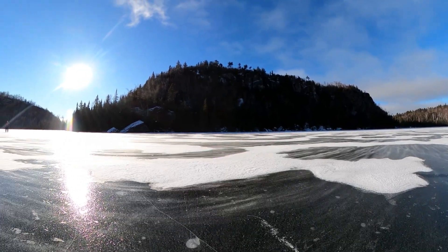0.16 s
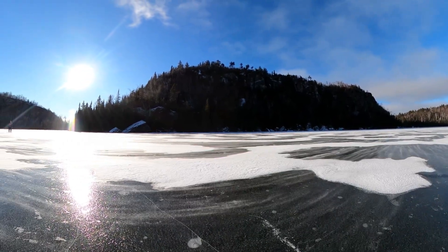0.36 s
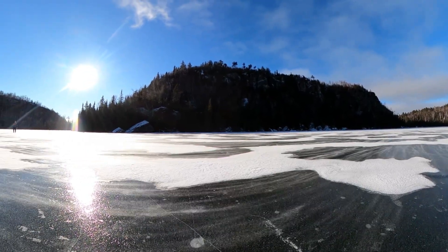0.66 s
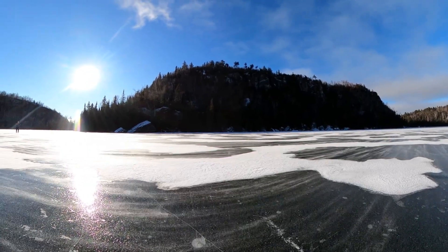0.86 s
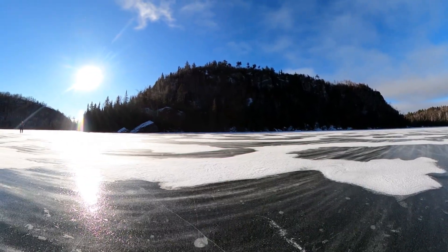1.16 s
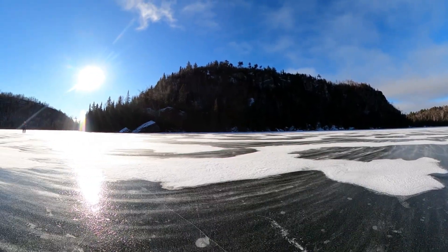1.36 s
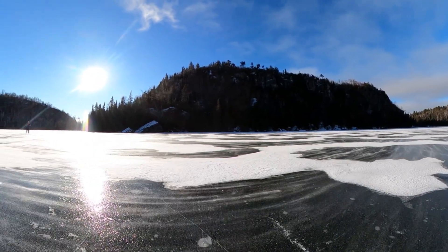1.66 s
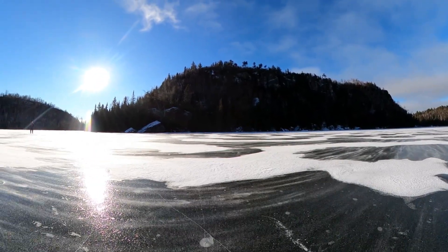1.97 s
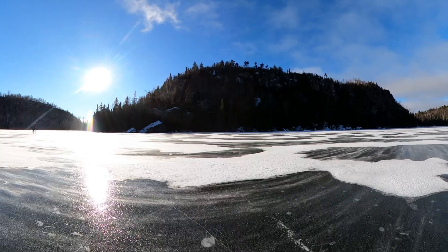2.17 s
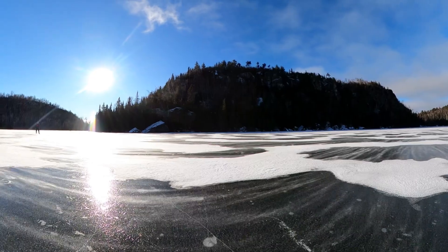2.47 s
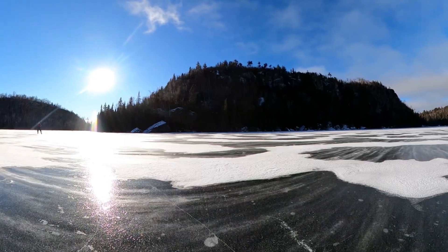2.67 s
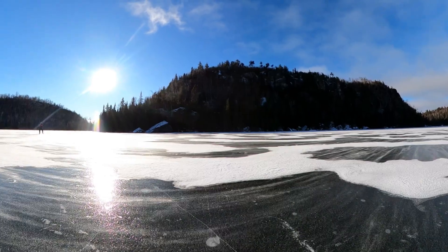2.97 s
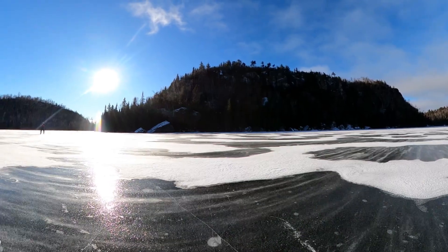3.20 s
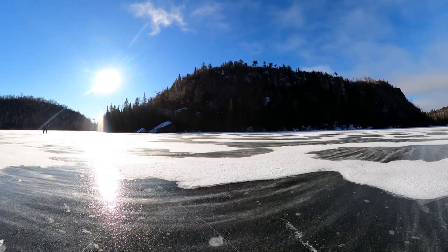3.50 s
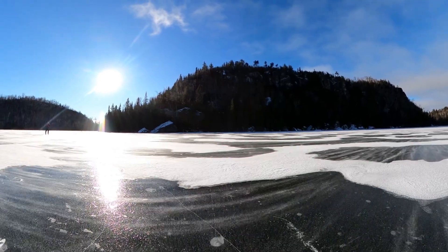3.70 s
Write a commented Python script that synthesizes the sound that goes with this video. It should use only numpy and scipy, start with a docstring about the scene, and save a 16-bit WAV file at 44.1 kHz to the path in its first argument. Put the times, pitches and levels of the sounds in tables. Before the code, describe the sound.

Strong gusty wind buffets a microphone with deep heavy rumble, sputtering crackle and sharp pops

```python
"""Wind on microphones by a frozen lake

Gusts sweep over the ice and buffet a camera's microphones. Eddies push on the port as a heavy rumble:
coloured noises under level curves, with cosines that swell and fade for single thumps, deep or higher.
Tearing air sputters and pops: noise in uneven spurts, kept above a steep crossover to a second microphone.
Two brief hoarse whistles are wavering sines. A soft knock and a few ticks of blown ice grains
are noise under short envelopes, over a faint steady hiss of noise."""
import sys
import numpy as np
from scipy import signal
from scipy.fft import rfft, irfft
from scipy.io import wavfile
from scipy.ndimage import uniform_filter1d

SR = 44100
rng = np.random.default_rng(int(sys.argv[2]) if len(sys.argv) > 2 else 0)


def pcm_store(signal):
    """Save signal as 16-bit PCM."""
    levels = np.round(np.clip(np.atleast_2d(signal), -1, 1) * 32767)
    wavfile.write(sys.argv[1], SR, levels.astype(np.int16).T)


N = 169344
TIME = np.arange(N) / SR  # seconds

# Gust levels before the trims below, from the deepest layer to the highest: time_s, level_db
# deepest rumble, the push of the large eddies
PUSH_LEVEL = [(0.0, -25.5), (0.2, -35.0), (0.37, -26.0), (0.43, -33.0), (0.5, -22.0), (0.59, -26.0),
              (0.65, -33.0), (0.86, -34.5), (0.89, -38.0), (0.95, -31.5), (1.34, -29.5), (1.38, -25.5),
              (1.65, -27.0), (1.68, -33.0), (1.78, -25.0), (2.04, -33.0), (2.12, -30.5), (2.32, -44.5),
              (2.43, -30.5), (2.57, -40.5), (2.6, -30.5), (2.76, -37.5), (2.81, -26.5), (2.92, -35.0),
              (3.05, -34.5), (3.08, -39.0), (3.22, -28.5), (3.35, -33.0), (3.43, -27.0), (3.46, -33.5),
              (3.69, -28.5), (3.83, -38.0)]
# buffeting around 100 Hz
BUFFET_LEVEL = [(0.0, -35.0), (0.06, -40.0), (0.62, -29.5), (0.66, -37.5), (0.75, -32.0), (0.89, -45.5),
                (0.93, -30.5), (1.03, -42.5), (1.19, -29.5), (1.27, -35.0), (1.35, -25.0), (1.46, -38.5),
                (1.6, -29.0), (1.75, -37.0), (1.88, -31.0), (1.92, -36.5), (2.06, -31.5), (2.21, -41.0),
                (2.27, -38.0), (2.39, -41.5), (2.55, -38.5), (2.59, -26.0), (2.73, -44.0), (2.76, -29.5),
                (2.83, -38.0), (2.9, -33.0), (3.06, -41.0), (3.18, -38.0), (3.23, -30.0), (3.29, -35.5),
                (3.37, -29.0), (3.51, -38.0), (3.54, -30.5), (3.83, -35.0)]
# flapping around 200 Hz
FLAP_LEVEL = [(0.0, -48.0), (0.15, -54.5), (0.22, -45.5), (0.38, -56.5), (0.58, -43.0), (0.68, -51.0),
              (0.74, -46.0), (0.85, -57.5), (1.03, -60.5), (1.07, -46.5), (1.23, -58.0), (1.39, -43.5),
              (1.48, -51.5), (1.67, -44.5), (1.72, -49.5), (1.8, -40.0), (1.92, -45.5), (2.12, -43.5),
              (2.32, -57.0), (2.44, -51.5), (2.51, -55.0), (2.6, -40.0), (2.72, -56.5), (2.78, -45.0),
              (3.16, -47.0), (3.22, -44.0), (3.49, -44.0), (3.55, -37.5), (3.64, -44.0), (3.83, -42.0)]
# roar of the small eddies
ROAR_LEVEL = [(0.0, -67.0), (0.23, -64.0), (0.41, -66.5), (0.49, -56.5), (0.68, -65.5), (0.77, -58.0),
              (0.81, -68.5), (1.02, -69.5), (1.13, -64.5), (1.25, -69.5), (1.41, -58.5), (1.46, -67.0),
              (1.55, -63.0), (1.68, -64.5), (1.75, -56.5), (1.96, -63.5), (2.09, -62.0), (2.4, -69.0),
              (2.59, -59.0), (2.74, -70.0), (2.83, -61.5), (3.08, -65.5), (3.16, -62.5), (3.22, -49.0),
              (3.29, -61.0), (3.34, -51.0), (3.43, -59.0), (3.5, -54.0), (3.58, -48.0), (3.63, -55.0),
              (3.76, -48.5), (3.83, -62.5)]
# sputter of the tearing air
SPUTTER_LEVEL = [(0.0, -57), (0.018, -53), (0.084, -64), (0.103, -50), (0.15, -54), (0.18, -78),
                 (0.208, -50), (0.228, -51), (0.258, -71), (0.288, -48), (0.325, -57), (0.355, -48),
                 (0.377, -73), (0.449, -45), (0.503, -39), (0.539, -55), (0.563, -41), (0.6, -53),
                 (0.682, -43), (0.79, -42), (0.85, -49), (0.94, -54), (0.952, -42), (1.137, -51),
                 (1.161, -44), (1.179, -67), (1.209, -41), (1.227, -54), (1.251, -42), (1.275, -52),
                 (1.38, -53), (1.41, -41), (1.449, -66), (1.485, -49), (1.533, -63), (1.556, -50),
                 (1.622, -47), (1.658, -59), (1.682, -53), (1.712, -66), (1.73, -49), (1.784, -54),
                 (1.874, -45), (1.993, -50), (2.077, -47), (2.095, -60), (2.197, -55), (2.239, -61),
                 (2.353, -51), (2.395, -84), (2.545, -82), (2.57, -60), (2.598, -53), (2.628, -63),
                 (2.676, -50), (2.698, -54), (2.708, -68), (2.73, -74), (2.82, -54), (2.939, -65),
                 (2.987, -56), (3.01, -62), (3.05, -51), (3.131, -54), (3.145, -66), (3.175, -70),
                 (3.191, -56), (3.31, -50), (3.325, -62), (3.36, -63), (3.406, -47), (3.55, -43),
                 (3.598, -55), (3.658, -40), (3.712, -49), (3.741, -40), (3.765, -54), (3.795, -40),
                 (3.837, -53)]
# Trims added to the tabulated levels, dB
PUSH_TRIM_DB, BUFFET_TRIM_DB, FLAP_TRIM_DB, ROAR_TRIM_DB = 0.5, 0.52, 0.9, 0.55
SPUTTER_TRIM_DB, POP_TRIM_DB = 0.45, -2

# Relative spectra of the noises, each scaled to rms 1 after filtering: frequency_hz, relative_db
PUSH_SPECTRUM = [(5, -19.5), (15, 0.5), (28, 3.5), (40, -5.5), (55, 4), (72, -2), (95, -15), (150, -36),
                 (300, -99.5)]
BUFFET_SPECTRUM = [(50, -21.5), (80, 1.5), (100, 3.5), (120, 1.5), (145, -5), (170, -14), (220, -44.5),
                   (400, -87.5)]
FLAP_SPECTRUM = [(120, -21), (170, 3), (205, 1), (240, -8.5), (280, -17.5), (360, -29), (700, -82)]
ROAR_SPECTRUM = [(180, -13.5), (280, 0.5), (340, -4), (420, -9.5), (520, -14), (700, -23), (1000, -31),
                 (1400, -33.5), (2500, -74)]
SPUTTER_SPECTRUM = [(1500, 5.5), (1900, -1), (2400, -9.5), (3000, -16.5), (4000, -29), (5000, -43),
                    (7000, -62.5), (10000, -91.5)]
HISS_SPECTRUM = [(100, 5), (700, 10), (1300, 3), (2500, -2.5), (4000, 4), (6000, 3.5), (7300, 5.5),
                 (7800, -0.5), (8500, -13.5), (9200, -18), (10500, -19.5), (13000, -32.5)]
KNOCK_SPECTRUM = [(500, -27), (880, 9), (1150, 0), (1500, -33)]
TICK_SPECTRUM = [(1500, 6), (3500, 3), (4500, 14.5), (5500, 1), (7500, 3.5), (9000, -27), (13000, -40.5)]

# Brief dropouts of the rumble: centre_s, depth_db, half_length_s
RUMBLE_LULLS = [(.893, 15, .02), (1.03, 13, .008), (1.275, 9, .01), (2.395, 7, .012)]
# Depth of the sputter's spurts, as the flow grows smoother halfway: time_s, depth_db
SPURT_DEPTH = [(1.7, 5), (2.2, 3.5)]
# Single eddies bursting on the port: centre_s, level_db (before trim), width_s, tilt_db_per_octave
POP_EVENTS = [(0.0103, -46, 0.015, 3), (.142, -46.5, 0.0021, -15), (0.297, -43, 0.0029, -11),
              (.313, -36, 0.00077, -7), (0.345, -38, 0.0032, -5), (0.4527, -32.5, 0.0047, -6),
              (0.467, -26, 0.0003, 9), (0.4815, -34, 0.00069, 4), (0.4888, -33.5, 0.0011, 8.5),
              (0.4985, -36, 0.0027, 6), (0.568, -29.5, 0.0013, 3.5), (0.5773, -35, 0.0015, 3),
              (.655, -38.5, 0.0024, -10), (0.682, -36, 0.0022, -3), (0.7319, -25.5, 0.001, -2.5),
              (0.8137, -32.5, 0.0013, -4.5), (0.8798, -29, 0.00027, -6), (0.957, -38, 0.0051, 4.5),
              (0.991, -40, 0.0032, -8), (1.024, -44.5, 0.0015, 11), (1.08, -50, 0.0021, 17),
              (1.098, -32, 0.0013, -16), (1.1543, -37.5, 0.0045, -8), (1.196, -39, 0.0017, -13),
              (1.253, -33, 0.0019, 0), (1.289, -33.5, 0.0017, -15), (1.3078, -26, 0.00067, 0),
              (1.3162, -32.5, 0.00052, -1), (1.335, -35, 0.00093, 3), (1.352, -29, 0.0012, 3),
              (1.3928, -31.5, 0.0052, 9), (1.408, -37.5, 0.0042, 15), (1.465, -31.5, 0.00036, 5),
              (1.483, -31, 0.00085, 7), (1.59, -37, 0.0019, 9), (1.6279, -36, 0.0025, 4.5),
              (1.7712, -36, 0.0024, 2), (1.844, -38, 0.0024, 2.5), (1.873, -38.5, 0.0013, 11),
              (1.888, -39, 0.0021, 10), (1.929, -34.5, 0.00089, 4), (2.013, -40, 0.0025, 8.5),
              (2.027, -37.5, 0.00065, 5), (2.06, -35, .001, 0), (2.066, -37, 0.00051, 8),
              (2.073, -39, 0.00043, 1), (2.079, -33, 0.00055, -6), (2.641, -40.5, .001, -1.5),
              (2.673, -40, 0.0012, -5), (2.698, -43, .001, -9), (2.8207, -40, 0.0011, -2),
              (2.8366, -40.5, 0.0011, 2.5), (2.9861, -34, 0.0015, 7.5), (3.1945, -42.5, 0.0013, -2.5),
              (3.408, -30, 0.00068, 4), (3.5381, -27.5, 0.0012, 8), (3.551, -34, 0.0013, 12),
              (3.6593, -43.5, 0.004, 8.5), (3.7229, -32, 0.0013, -27), (3.7418, -27, 0.001, 12.5),
              (3.8, -27.5, 0.00088, 5.5)]
# Single thumps on the microphone, deep or higher-pitched: centre_s, peak_level_db, pitch_hz
THUMP_EVENTS = [(.365, -21, 30.6), (0.591, -17.5, 70), (2.084, -26.5, 58.8), (2.115, -29, 108),
                (3.217, -40.5, 304), (3.235, -20, 88), (3.345, -41, 278), (3.526, -48.5, 430),
                (3.55, -22.5, 92), (3.584, -45.5, 370), (3.735, -41, 316)]
# Brief hoarse whistles beside moderate pops: start_s, level_db, decay_s, pitch_ratio, loss_db_per_higher_mode
WHISTLE_EVENTS = [(0.497, -26.5, 0.0037, .92, 8), (1.41, -36, 0.0069, 0.94, 1)]
# Resonances of the port, before each whistle's pitch ratio and losses: frequency_hz, relative_db
PORT_RESONANCES = [(2180, 6.5), (2780, 5), (3450, 0.5), (4180, -12), (4820, -25.5)]
# Ice grains on the case: start_s, level_db
TICK_EVENTS = [(.504, -55.5), (1.495, -60), (3.41, -58), (3.425, -54.5)]

CROSSOVER_HZ, CROSSOVER_SOFTNESS_HZ = 1446.4, 5.4  # a second microphone takes over above this
BRIGHT_DB, BRIGHT_GROWTH = -10, 0.5  # share of bright spurts at the median gust; its growth, dB per dB
CRACKLE_DB = 4.8  # rms swing of the fast crackle
PUFF_HZ, PUFF_SWING, PUFF_WIDTH_HZ, PUFF_DB = 1860, 0.15, 220, -4  # swing: rms share of the centre
KNOCK_S, KNOCK_DB, KNOCK_WIDTH_S = 0.364, -58.5, 0.007
THUMP_CYCLES, THUMP_SPREAD_S = 0.36, 0.006  # half length: a share of a cycle plus the eddy's passing time
WHISTLE_RISE_S, WHISTLE_SAG_PER_S, WHISTLE_JITTER = 0.0011, 0.28, 0.03  # jitter: rms share of the pitch
TICK_DECAY_S = 0.0081
HISS_DB = -71.5
FADE_S, BAND_LIMIT_HZ = 0.003, 13500


def amp(db):
    """Logarithmic level: decibels converted to an amplitude gain."""
    return 10 ** (np.asarray(db) / 20)


def unit(x):
    """Power normalization: scales a signal to rms 1."""
    return x / np.sqrt(np.mean(x ** 2) + 1e-20)


def level(curve):
    """Amplitude envelope: gain interpolated in decibels between the points of a level curve."""
    return amp(np.interp(TIME, *np.transpose(curve)))


def colour(x, points, tilt_db=0):
    """Spectral shaping by a curve, tilted in dB per octave from its first point to its last."""
    octave = np.log2(np.fft.rfftfreq(len(x), 1 / SR) + 1)
    hz, db = np.transpose(points)
    first, last = np.log2(hz[0]), np.log2(hz[-1])
    octaves_above = np.clip(octave, first, last) - first
    response_db = np.interp(octave, np.log2(hz), db) + tilt_db * octaves_above
    return irfft(rfft(x) * amp(response_db), len(x))


def noise(points):
    """Filtered white noise: a random signal with the given spectrum and rms 1."""
    return unit(colour(rng.standard_normal(N), points))


def wander(low_hz, high_hz):
    """Band-limited fluctuation: random, of rms 1, mostly between two rates."""
    f = np.fft.rfftfreq(N, 1 / SR)
    high_pass = f / np.hypot(f, low_hz)
    low_pass = 1 / np.hypot(1, (f / high_hz) ** 2)
    return unit(irfft(rfft(rng.standard_normal(N)) * high_pass * low_pass, N))


def steadied(x, span_s):
    """Running power normalization: evens out slow chance swells so that the level curve sets the gusts."""
    size = max(int(span_s * SR), 2)
    power = uniform_filter1d(uniform_filter1d(x ** 2, size), size)
    return x / np.sqrt(abs(power) + 1e-12)


def crossover(x):
    """High-pass filtering: steep edge where a second microphone takes over sputter, pops and whistles."""
    f = np.fft.rfftfreq(len(x), 1 / SR)
    return irfft(rfft(x) * 0.5 * (1 + np.tanh((f - CROSSOVER_HZ) / CROSSOVER_SOFTNESS_HZ)), len(x))


def rumble():
    """Turbulent pressure: eddies of four sizes press on the microphone, the smaller three in shared lumps."""
    lumps = wander(low_hz=2.1, high_hz=35.4)
    lull = amp(-sum(db * np.exp(-((TIME - s) / half_s) ** 2) for s, db, half_s in RUMBLE_LULLS))
    push = steadied(noise(PUSH_SPECTRUM), span_s=0.069)
    push *= amp(PUSH_TRIM_DB) * level(PUSH_LEVEL)
    buffet = steadied(noise(BUFFET_SPECTRUM) * amp(1.0 * lumps), span_s=0.07)
    buffet *= amp(BUFFET_TRIM_DB) * level(BUFFET_LEVEL)
    flap = steadied(noise(FLAP_SPECTRUM) * amp(3 * lumps), span_s=0.09)
    flap *= amp(FLAP_TRIM_DB) * level(FLAP_LEVEL)
    # the shorter span leaves the roar's swells more even
    roar = steadied(noise(ROAR_SPECTRUM) * amp(2.5 * lumps), span_s=0.037)
    roar *= amp(ROAR_TRIM_DB) * level(ROAR_LEVEL)
    return lull * (push + buffet + flap) + roar + thumps()


def sputter():
    """Flow separation: air tears off in crackling spurts, brighter when spurt or gust is strong."""
    spurts = 2.2 * np.tanh(wander(low_hz=25, high_hz=110) / 2.2)
    depth_db = np.interp(TIME, *np.transpose(SPURT_DEPTH))
    crackle = amp(CRACKLE_DB * wander(low_hz=119, high_hz=510))
    air = rng.standard_normal(N) * crackle
    gust = level(SPUTTER_LEVEL)
    dull = tearing(air, tilt_db=-2.0) * unit(amp(depth_db * spurts))
    # the bright part swings deeper, so it stands out in the strong spurts
    bright = tearing(air, tilt_db=4) * unit(amp(1.35 * depth_db * spurts))
    bright_share = amp(BRIGHT_DB) * (gust / np.median(gust)) ** BRIGHT_GROWTH
    flow = steadied(dull + puffs() + bright_share * bright, span_s=0.035)
    return amp(SPUTTER_TRIM_DB) * gust * flow


def tearing(air, tilt_db):
    """Broadband flow noise: tearing air coloured by its spectrum above the crossover, at rms 1."""
    return unit(crossover(colour(air, SPUTTER_SPECTRUM, tilt_db)))


def puffs():
    """Narrow-band modulation: hollow puffs of noise around a wandering centre frequency."""
    hz = PUFF_HZ * np.exp(PUFF_SWING * wander(low_hz=10.18, high_hz=51.36))
    carrier = np.cos(2 * np.pi * np.cumsum(hz) / SR)
    body = wander(low_hz=1, high_hz=PUFF_WIDTH_HZ) * carrier
    return amp(PUFF_DB) * unit(body * amp(8.6 * wander(low_hz=10, high_hz=67.5)))


def hiss():
    """Stationary noise: a faint hiss of constant level."""
    return amp(HISS_DB) * noise(HISS_SPECTRUM)


def pops():
    """Transient turbulence: each bursting eddy is a short swell of the same tearing noise."""
    out = np.zeros(N)
    size = 4096  # samples
    for s, db, width_s, tilt_db in POP_EVENTS:
        at = int(s * SR) + np.arange(size) - size // 2
        swell = np.exp(-abs(at / SR - s) / width_s)
        burst = tearing(rng.standard_normal(size) * swell, tilt_db) * np.hanning(size)
        # tearing() levels the whole burst; this restores the power of its swell
        burst *= amp(db + POP_TRIM_DB) * np.sqrt(2 * np.mean(swell ** 2))
        inside = (at >= 0) & (at < N)
        out[at[inside]] += burst[inside]
    return out


def knock():
    """Soft impact: one faint knock of noise that swells and decays exponentially."""
    return amp(KNOCK_DB) * np.exp(-abs(TIME - KNOCK_S) / KNOCK_WIDTH_S) * noise(KNOCK_SPECTRUM)


def thumps():
    """Forced displacement: each thump is a cosine that swells and fades under a symmetric Gaussian."""
    phases = rng.uniform(0, 2 * np.pi, len(THUMP_EVENTS))
    out = np.zeros(N)
    for (s, db, hz), phase in zip(THUMP_EVENTS, phases):
        t = TIME - s
        half_s = THUMP_SPREAD_S + THUMP_CYCLES / hz
        out += amp(db) * np.exp(-(t / half_s) ** 2) * np.cos(2 * np.pi * hz * t + phase)
    return out


def whistles():
    """Cavity resonance: the port rings in two brief hoarse whistles, sagging as the flow slackens."""
    out = np.zeros(N)
    rates_hz = [hz * (1 + WHISTLE_JITTER * wander(low_hz=30, high_hz=400)) for hz, _ in PORT_RESONANCES]
    for s, db, decay_s, ratio, loss_db in WHISTLE_EVENTS:
        t = np.clip(TIME - s, 0, 0.2)
        pitch = ratio * (1 - WHISTLE_SAG_PER_S * t)
        ring = np.zeros(N)
        for k, (_, mode_db) in enumerate(PORT_RESONANCES):
            phase = 2 * np.pi * np.cumsum(rates_hz[k] * pitch) / SR
            ring += amp(mode_db - k * loss_db) * np.sin(phase)
        out += amp(db) * np.minimum(t / WHISTLE_RISE_S, 1) * np.exp(-t / decay_s) * ring
    return out


def ticks():
    """Damped impact: ice grains strike the case and die away exponentially within milliseconds."""
    strikes = sum(amp(db) * (TIME > s) * np.exp(-abs(TIME - s) / TICK_DECAY_S) for s, db in TICK_EVENTS)
    return strikes * noise(TICK_SPECTRUM)


def scene():
    """Superposition: wind on the microphones, ticks and a knock add to a steady faint hiss."""
    wind = rumble() + crossover(sputter() + pops() + whistles())
    return (wind + ticks() + knock() + hiss())[None]


def record(dry):
    """Band limitation: a low-pass filter follows brief fades at both ends."""
    to_nearest_end = np.minimum(TIME, TIME[::-1])
    fade = np.sin(np.pi / 2 * np.clip(to_nearest_end / FADE_S, 0, 1)) ** 2
    low_pass = signal.firwin(511, BAND_LIMIT_HZ, window=("kaiser", 9), fs=SR)
    return signal.oaconvolve(dry * fade, low_pass[None], "same")


dry = scene()
out = record(dry)
pcm_store(out)
```